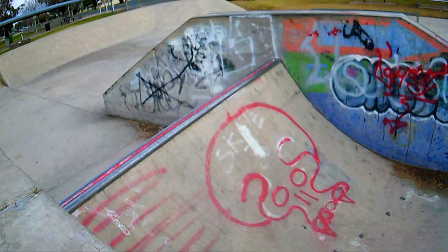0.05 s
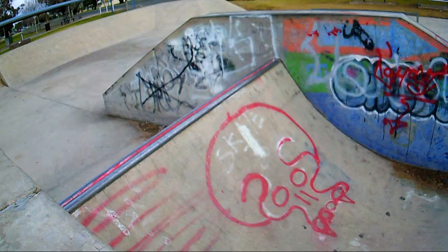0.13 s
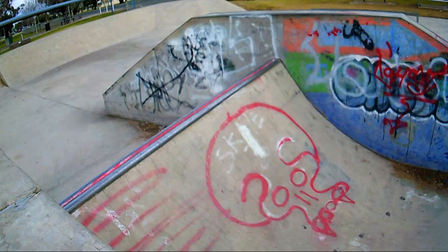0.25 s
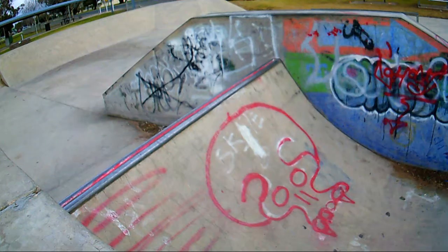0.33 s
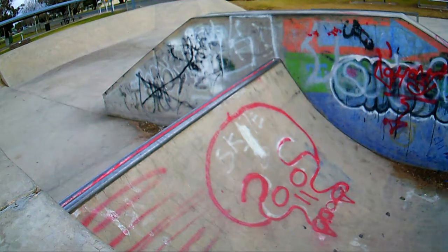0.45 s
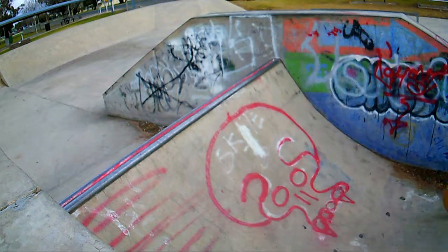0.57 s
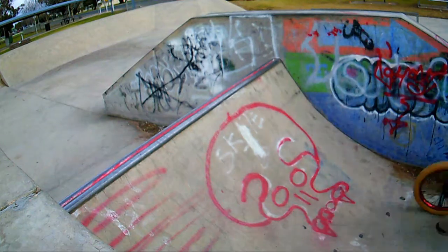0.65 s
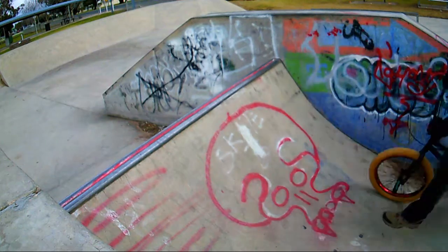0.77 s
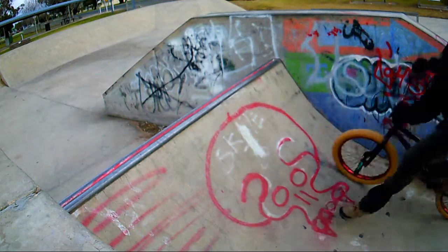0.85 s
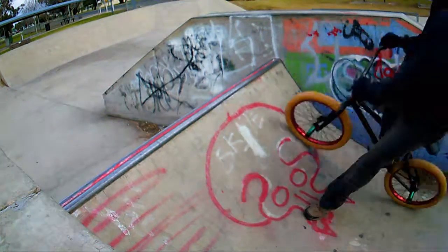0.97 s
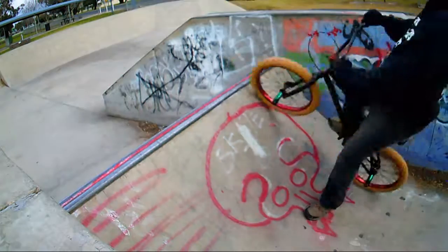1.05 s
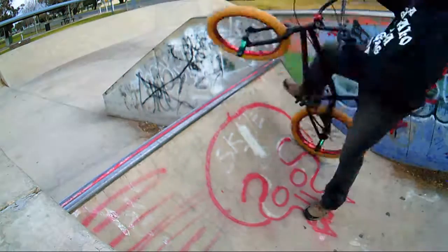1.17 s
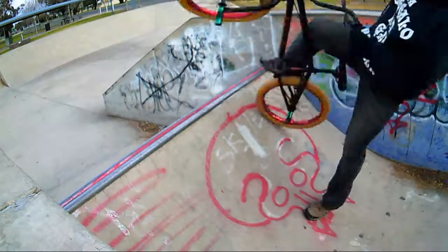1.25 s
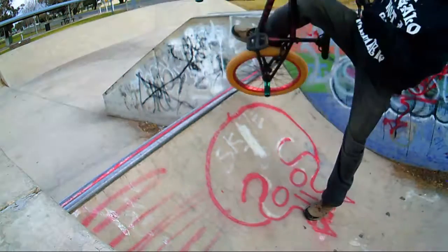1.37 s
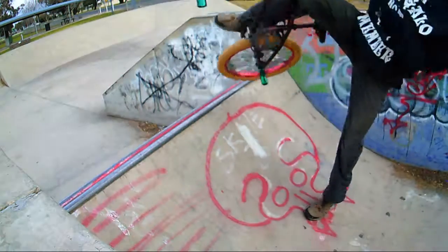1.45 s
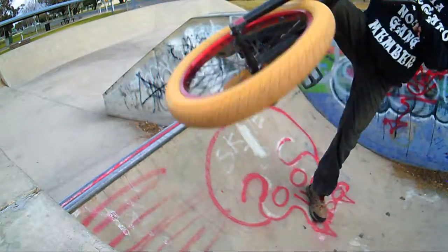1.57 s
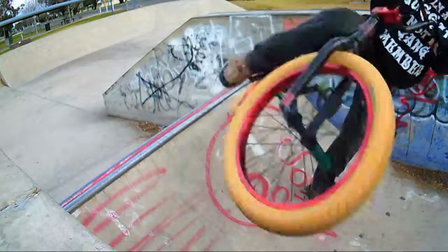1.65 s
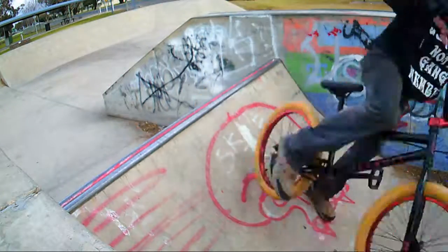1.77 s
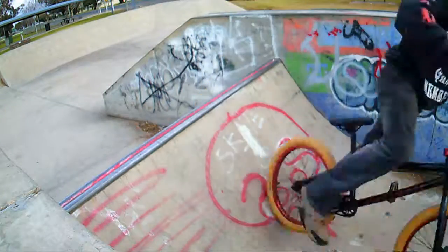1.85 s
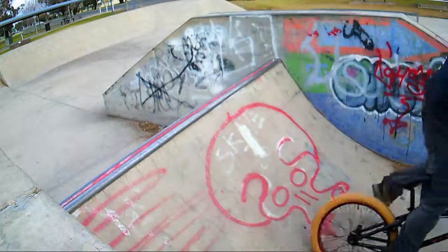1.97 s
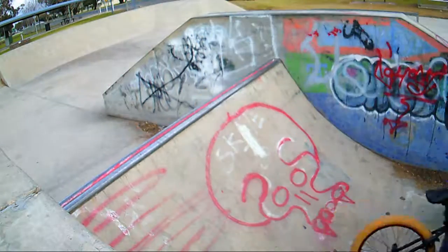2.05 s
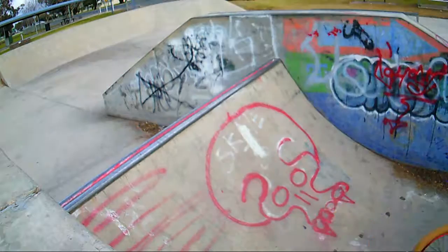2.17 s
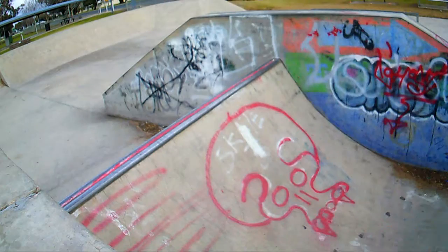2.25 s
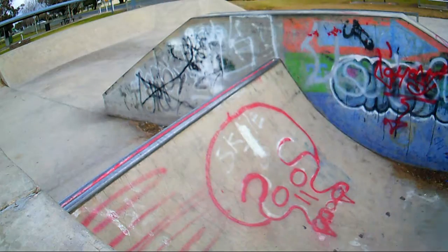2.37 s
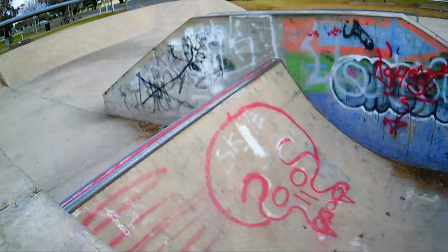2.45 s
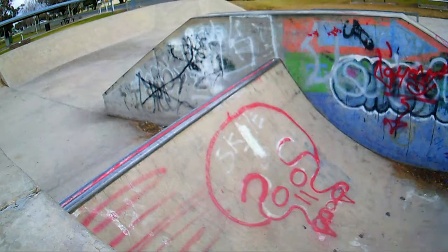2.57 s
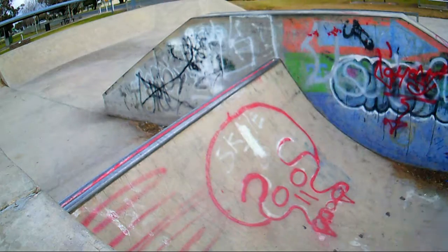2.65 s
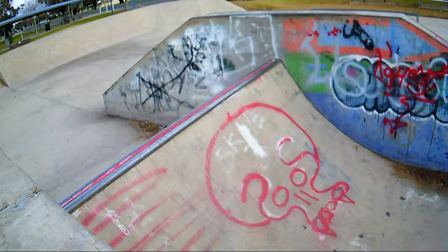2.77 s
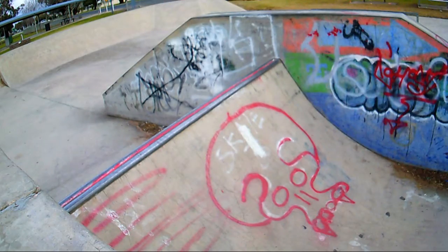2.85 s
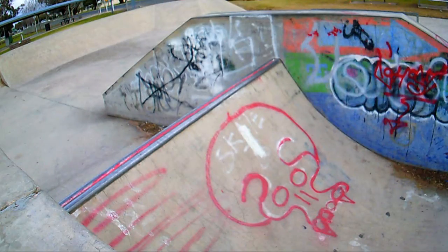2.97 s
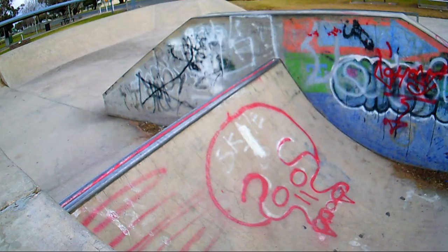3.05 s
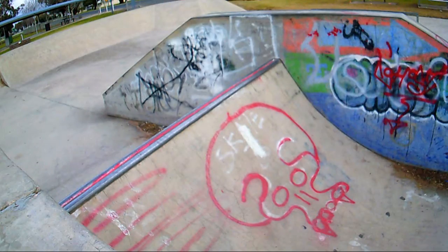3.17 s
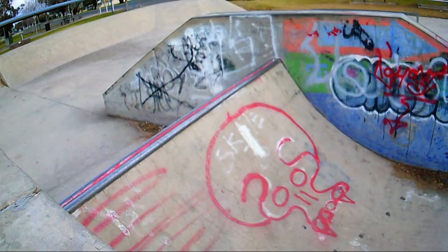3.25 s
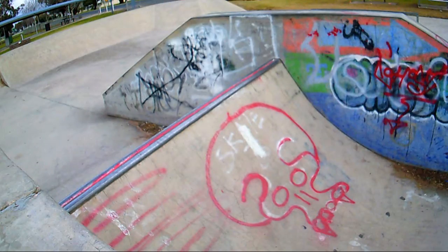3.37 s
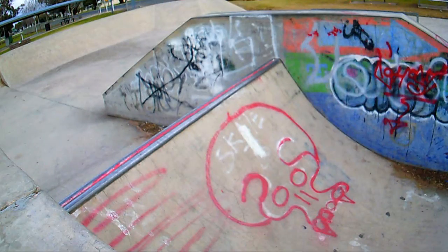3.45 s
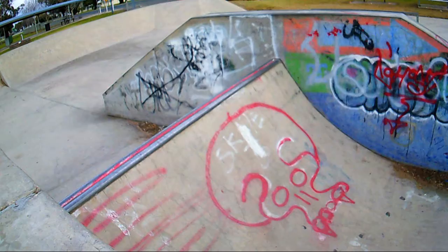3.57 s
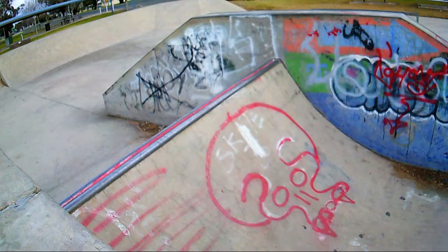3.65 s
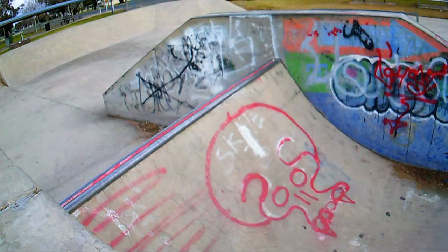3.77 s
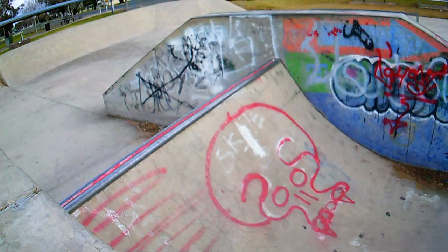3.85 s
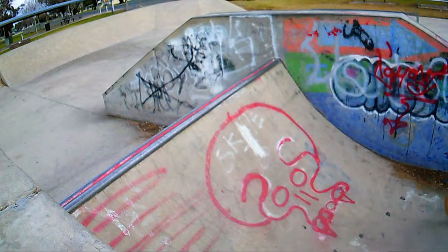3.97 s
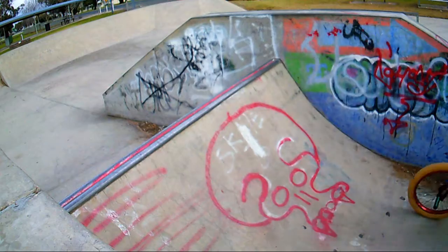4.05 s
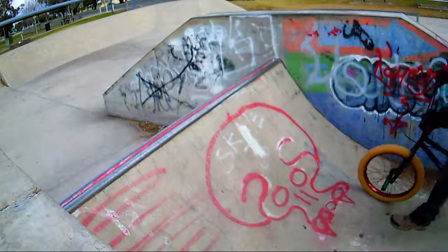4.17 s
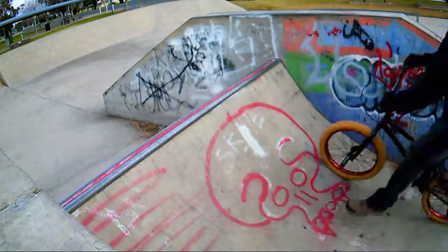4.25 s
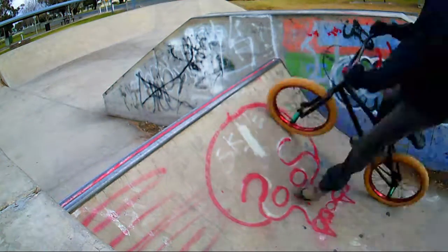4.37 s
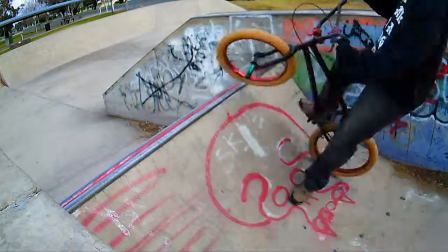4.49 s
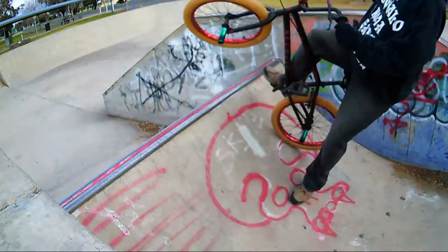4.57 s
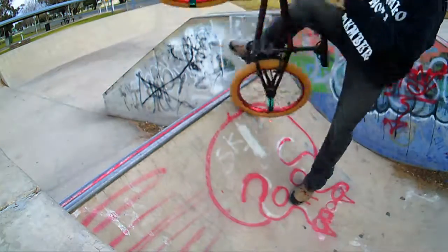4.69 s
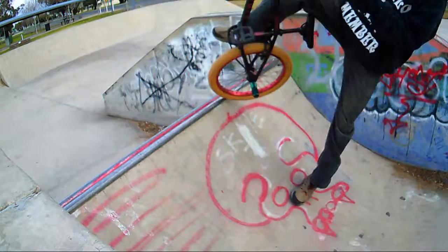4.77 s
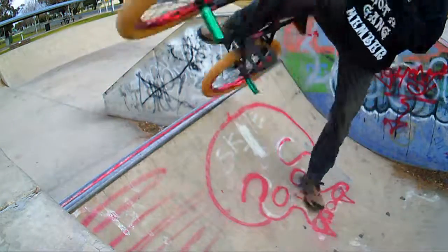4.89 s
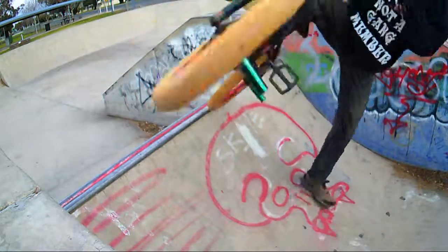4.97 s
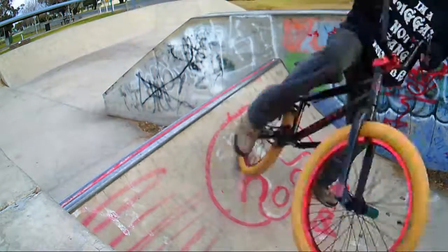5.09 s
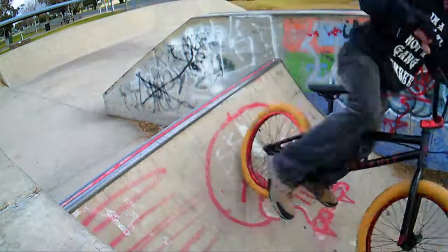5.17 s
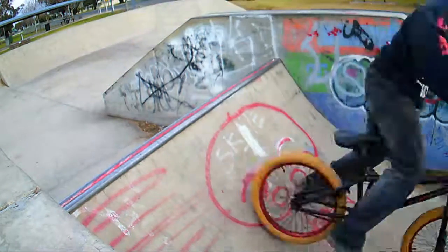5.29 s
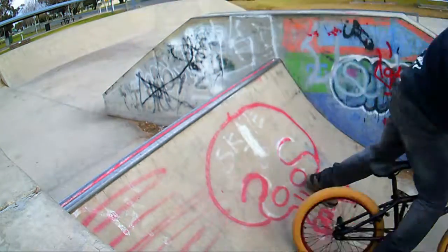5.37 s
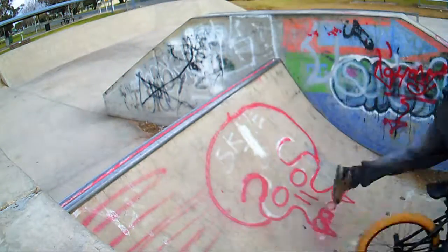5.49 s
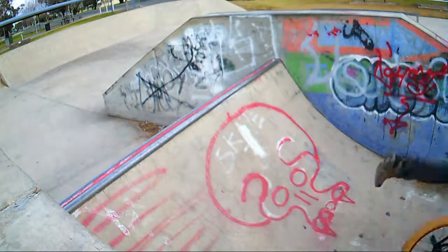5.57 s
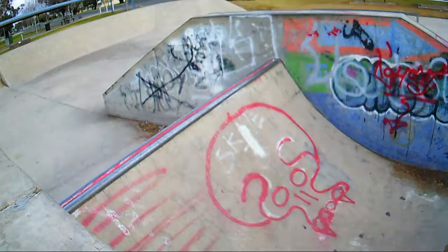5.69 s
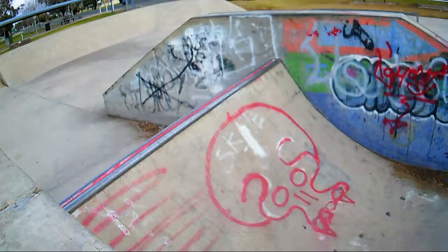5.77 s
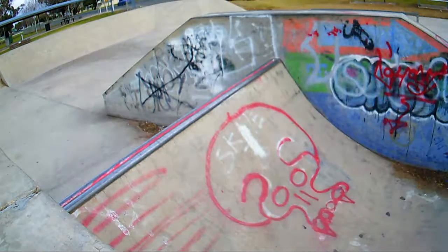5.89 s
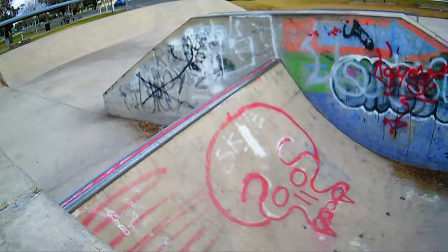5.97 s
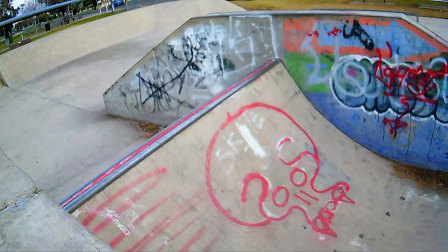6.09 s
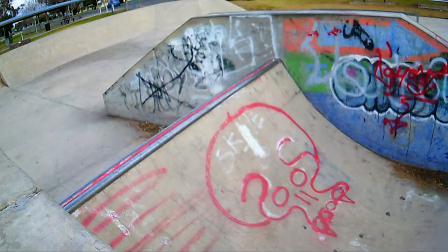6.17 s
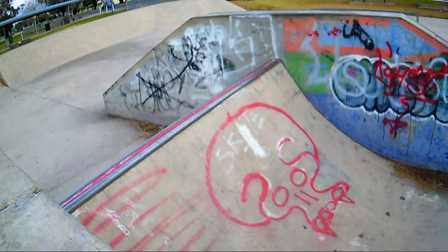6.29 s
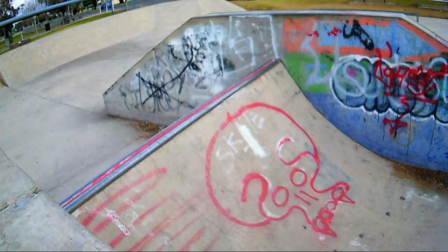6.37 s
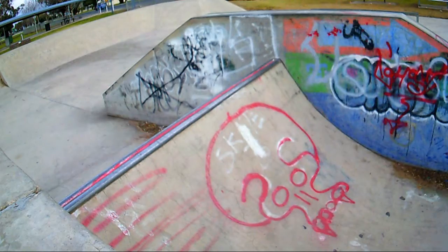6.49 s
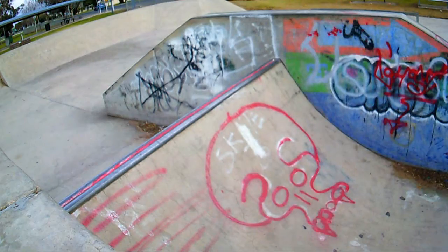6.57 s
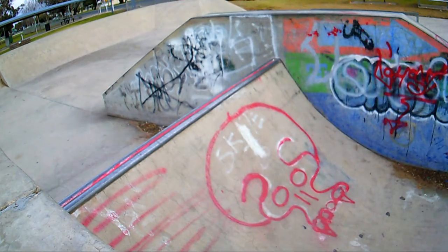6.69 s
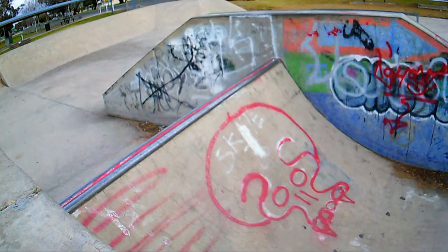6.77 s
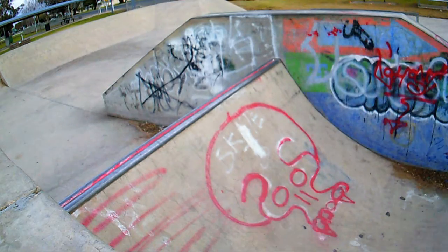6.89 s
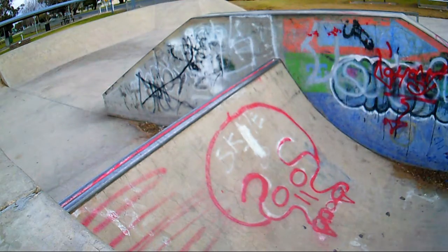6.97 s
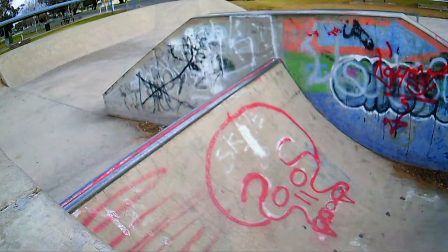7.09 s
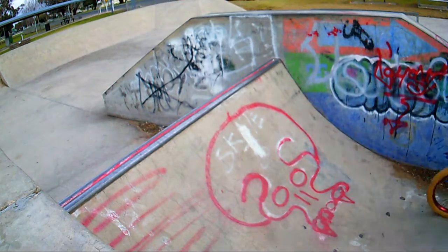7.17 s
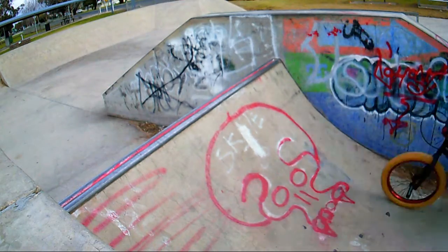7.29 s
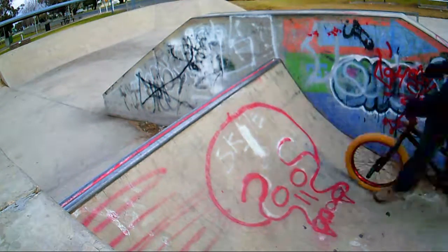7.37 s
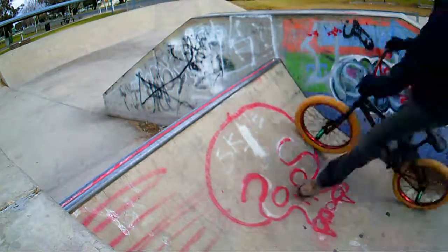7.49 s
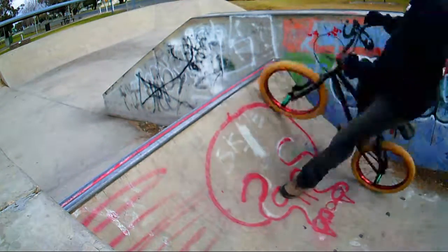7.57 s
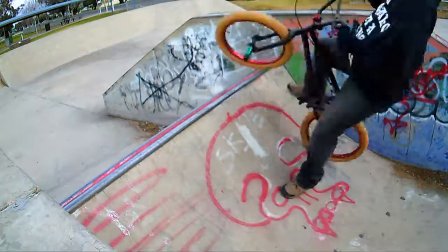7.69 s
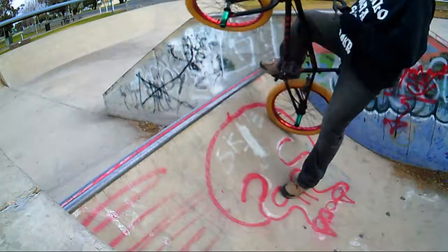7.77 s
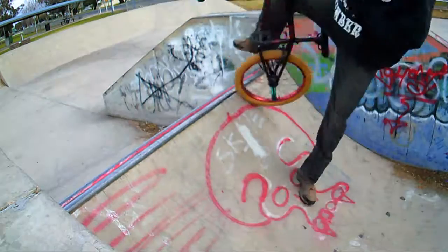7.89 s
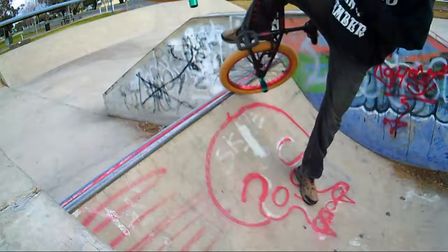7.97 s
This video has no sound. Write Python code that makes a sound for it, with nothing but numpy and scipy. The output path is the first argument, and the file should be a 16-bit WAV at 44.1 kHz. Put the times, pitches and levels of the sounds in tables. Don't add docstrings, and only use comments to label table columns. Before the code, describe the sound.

Outdoors on concrete, a small bicycle coasts in with a ticking freewheel, then lands in a loud cluster of dull knocks and rattles near two seconds. A second, quieter pass clatters past five seconds, and a third brings only light knocks. Traffic drones throughout, with engines pulling away after abrupt background changes. The close microphone sounds muffled, as if inside a case.

```python
import sys
import numpy as np
from scipy import signal
from scipy.fft import rfft, irfft, next_fast_len
from scipy.io import wavfile
from scipy.ndimage import uniform_filter1d, map_coordinates

SR = 44100
rng = np.random.default_rng(int(sys.argv[2]) if len(sys.argv) > 2 else 0)


def gain_from_db(level_db):
    decades = np.asarray(level_db, float) / 20
    return 10 ** decades


def to_wav(sig):
    pcm = np.clip(np.atleast_2d(sig), -1, 1) * 32767
    pcm = np.round(pcm).astype(np.int16)
    wavfile.write(sys.argv[1], SR, pcm.T)


N = 354563
T = np.arange(N) / SR


def unit(x):
    return x / np.sqrt(np.mean(x ** 2) + 1e-20)


def window(start, end):
    return np.clip(np.minimum(T - start, end - T) * 500 + .5, 0, 1)


def curves(rows):
    s, *columns = np.transpose(rows)
    return [np.interp(T, s, column) for column in columns] + [window(s[0] - .005, s[-1] + .005)]


def wobble(rate):
    return map_coordinates(rng.standard_normal(int(N * 80 / SR) + 9), [T * min(rate, 80)])


def filtered(x, response):
    m = next_fast_len(len(x) + 8192)
    return irfft(rfft(x, m) * response(np.fft.rfftfreq(m, 1 / SR)), m)[:len(x)]


def colour(points):
    f, v = np.transpose(points)
    return lambda hz: gain_from_db(np.interp(np.log(hz + 1), np.log(f + 1), v, left=-120, right=-120))


def modes(rows):
    def response(f):
        return sum((-1) ** k * gain_from_db(db) * 1j * f * width / (hz * hz - f * f + 1j * f * width)
                   for k, (hz, width, db) in enumerate(rows))
    return response


def rush(spectrum, patchy_db):
    z = signal.stft(rng.standard_normal(N + 512), nperseg=512)[2]
    field = uniform_filter1d(rng.standard_normal(z.shape), size=5, axis=0)
    field = uniform_filter1d(field, size=10, axis=1)
    patchy = signal.istft(z * gain_from_db(patchy_db * unit(field)), nperseg=512)[1][:N]
    return unit(filtered(patchy, colour(spectrum)))


CUTS = [-1, 3.1144, 6.6355, 9]


def per_take(values):
    return sum(v * window(CUTS[k], CUTS[k + 1]) for k, v in enumerate(values))


def contact(sharp, t60):
    t = np.arange(SR // 4) / SR
    fade = (gain_from_db(-60 * t / t60) + sharp * gain_from_db(-60 * t / 0.007)) * (1 - np.exp(-t / 0.0008))
    clumps = gain_from_db(5 * np.repeat(np.clip(rng.standard_normal(len(t) // 63), -2, 1.3), 63))
    blow = np.pad(rng.standard_normal(len(t)) * fade * clumps, (200, 0))
    blow[200:222] += 1.3 * sharp * np.hanning(22)
    return blow


# start_s, peak_db, body_db, hardness_db, t60_s
KNOCKS = [(1.855, -18.5, -2, -25, 0.048), (1.862, -23, -4, -14, 0.1), (1.894, -24.5, 1.5, -13, 0.091),
          (1.962, -18.5, -5, -19.5, 0.046), (1.982, -16.5, 0, -20.5, 0.08), (2.01, -27.5, 2, -25, 0.06),
          (4.446, -29, -2, -29, 0.061), (5.127, -23, 0, -17.5, 0.093), (5.149, -32, 3, -22.5, 0.1),
          (5.385, -17, -7, -13, 0.091), (5.409, -25, 0, -19.5, 0.26), (2.075, -32, 0, -25, 0.076)]
# start_s, peak_db, body_db, hardness_db, t60_s
CLACKS = [(1.002, -32.5, 3.5, -34, 0.11), (1.262, -38.5, -2.5, -26, 0.024), (1.57, -32, 2, -32.5, 0.056),
          (1.9493, -17, -6.5, -14, 0.15), (2.174, -19.5, -9.5, -58, 0.11), (2.189, -6, -21, -34, 0.035),
          (4.815, -25.5, -8.5, -34, 0.043), (5.013, -23.5, -4, -25, 0.034), (5.352, -13, -7, -25, 0.11),
          (6.393, -39.5, 9, -26, 0.048), (7.556, -25, -5, -27, 0.03), (7.566, -28, -2.5, -24, 0.021),
          (7.621, -35, 4, -28, 0.038), (7.932, -28, -10, -45, 0.11)]
# start_s, peak_db, metal_db
RATTLES = [(1.862, -45.5, -11.5), (1.905, -41.5, -18), (1.9383, -41.5, -21), (1.963, -42, -9),
           (1.983, -47, -13.5), (2.0172, -44.5, -9), (2.0537, -55.5, -23), (2.088, -53, -6.5),
           (2.113, -50, -12.5), (2.142, -52.5, -16), (2.256, -49.5, -32), (3.826, -55, -24),
           (4.4423, -49, -29.5), (5.1214, -50, -15.5), (5.174, -48, -13.5), (5.214, -50.5, -13),
           (5.288, -46, -12), (5.3094, -59.5, -14.5), (5.3374, -61, -26), (5.3453, -44.5, -13.5),
           (5.384, -46.5, -12.5), (5.409, -41, -31.5), (5.418, -40, -13.5), (5.445, -49.5, -15),
           (5.4934, -51, -7), (5.513, -56, -18.5), (6.3939, -56.5, -32.5), (7.929, -52, -35)]
# pitch_hz, width_hz, level_db
FRAME = [(224, 48, -5), (281.6, 41, -3.5), (376, 116, -2.5), (512, 82, -4), (780, 210, -6.5),
         (1000, 184, -3), (1314, 87, -3), (1633, 200, -5.5), (1820, 670, -16)]


def knocks():
    def muffled(rows, top_hz):
        return lambda hz: modes(rows)(hz) / (1 + 1j * hz / top_hz) ** 4

    def hits(rows, middle_db):
        return [(s, db, middle_db, body_db, hard_db, 1.09 * hard_db - 16.5, t60)
                for s, db, body_db, hard_db, t60 in rows]

    middle, body = muffled(FRAME[3:], top_hz=2860), muffled(FRAME[:3], top_hz=1160)
    edge = colour([(1500, -12.5), (2500, -4.5), (3800, -12.5), (4500, -31.5)])
    metal = colour([(4400, -15.5), (5800, -4.5), (6900, -10), (7900, 0.0), (9000, -12.5), (10200, -11.5),
                    (11200, -28.5), (11900, -28.5), (12400, 2.0), (12800, -8)])
    slaps = [(s, db, -60, -60, 0, metal_db, 0.058) for s, db, metal_db in RATTLES]
    out = np.zeros(N + SR)
    for rows, sharp in ((hits(KNOCKS, -3.5), .8), (hits(CLACKS, -9.5), 1.8), (slaps, .6)):
        for s, db, *parts_db, t60 in rows:
            blow = contact(sharp, t60)
            parts = [filtered(blow, response) for response in (middle, body, edge, metal)]
            mixed = sum(gain_from_db(db + gain) * part / np.abs(part).max() for gain, part in zip(parts_db, parts))
            out[round(s * SR) - 200:][:len(blow)] += mixed
    return out[:N]


# start_s, pitch_hz, level_db, t60_s
BOUNCES = [(1.006, 176, -31.5, 0.051), (1.6, 240, -42.5, 0.14), (1.955, 163, -19, 0.13),
           (1.9875, 93, -16.5, 0.43), (2.195, 94, -21.5, 0.082), (1.96, 360, -28, .15),
           (2.008, 385, -24.5, .1), (1.962, 790, -25.5, .1), (5.36, 1080, -25, .06),
           (5.371, 175, -20, 0.046), (5.13, 222, -30, .2), (2.174, 406, -20, 0.054),
           (7.558, 397, -28, 0.065), (1.861, 290, -23, 0.059), (5.129, 280, -26.5, 0.15),
           (5.39, 560, -24, 0.065), (2.19, 380, -14, 0.043), (2.1927, 1120, -12, 0.032),
           (4.4674, 338, -38.5, 0.23), (4.816, 236, -25.5, 0.072), (5.356, 260, -27.5, 0.22),
           (5.356, 320, -21, 0.14), (5.47, 285, -30.5, 0.14), (5.389, 88, -15.5, 0.55),
           (7.265, 230, -36.5, 0.12), (7.933, 204, -21.5, 0.056)]


def bounces():
    t = T[:SR]
    out = np.zeros(N + SR)
    for s, hz, db, t60 in BOUNCES:
        pitch = hz * (1 + 0.098 * (1 - np.exp(-t / 0.058)))
        fade = gain_from_db(db - 60 * (t / t60) ** 0.98) * (1 - np.exp(-t / 0.00056)) ** 2
        out[round(s * SR):][:SR] += fade * np.sin(2 * np.pi * np.cumsum(pitch) / SR)
    return out[:N]


# start_s, pitch_hz, peak_db
TAPS = [(1.8556, 991, -19), (1.8614, 1110.0, -23), (1.8646, 960.0, -20.5), (1.8688, 1130.0, -25),
        (1.8735, 980.0, -28), (1.8941, 960.0, -25.5), (1.9003, 810.0, -24), (1.908, 680.0, -22),
        (1.9495, 850.0, -13), (1.9562, 940.0, -16), (1.9605, 860.0, -17), (1.9635, 790.0, -22),
        (1.9759, 780.0, -23), (1.979, 1090.0, -24), (1.9839, 870.0, -18), (1.991, 850, -24),
        (2.006, 910.0, -24), (2.011, 910.0, -22), (2.1746, 750.0, -19.5), (2.1821, 690.0, -22),
        (2.1917, 1074, -9.5), (2.195, 1040, -19), (2.1989, 1120.0, -20.5), (2.2039, 1150.0, -22),
        (4.4423, 944, -25.5), (4.4472, 790.0, -26.5), (4.456, 970.0, -33), (4.4592, 950.0, -29),
        (4.8155, 1050, -26), (4.8335, 830.0, -32), (5.0134, 890, -24.5), (5.0193, 810.0, -28.5),
        (5.1278, 1101, -27), (5.1315, 1040.0, -27), (5.1388, 1100.0, -24), (5.1585, 900.0, -29),
        (5.1614, 1000, -28.5), (5.3526, 880, -13), (5.3582, 1050.0, -17), (5.363, 960.0, -22),
        (5.3856, 980.0, -20), (5.3888, 1050.0, -22), (5.3953, 866, -23.5), (5.3994, 800.0, -23.5),
        (5.404, 620.0, -24), (5.4264, 700.0, -21.5), (5.4452, 870.0, -24), (7.557, 820.0, -24.5),
        (7.5623, 780, -25.5), (7.5675, 980.0, -30), (7.9347, 876, -26.5),
        (1.0025, 700, -35),
    (1.2625, 900, -41),
    (1.571, 603, -30),
    (2.19, 638, -11),
    (4.8157, 1500, -31),
    (5.0135, 1880, -33),
    (5.129, 2100, -33),
    (6.3935, 700, -41),
    (7.6225, 798, -34.5),
]


def taps():
    ring_cycles, gain_db, top_hz = 9.9, 3, 2500
    out, t = np.zeros(N + SR), T[:SR // 20]
    for s, hz, db in TAPS:
        ring = sum(gain_from_db(level_db - 60 * t * hz / ring_cycles) * np.sin(2 * np.pi * ratio * hz * t)
                   for ratio, level_db in ((0.965, 0.5), (.55, -11.5), (1.483, -7.5)))
        out[round((s - .0003) * SR):][:len(t)] += gain_from_db(db + gain_db) * ring * (1 - np.exp(-t / 0.00036))
    low = signal.butter(6, top_hz / SR * 2, output="sos")
    return signal.sosfilt(low, out[:N])


# nearest_s, level_db, approach_s, leaving_s
PASSES = [
    (.97, -67, .16, 0.09),
    (1.92, -59, 0.04, 0.17),
    (2.24, -62.5, 0.044, 0.089),
    (4.298, -69.5, 0.14, 0.28),
    (4.86, -68.5, .05, 0.15),
    (5.2, -69.5, .03, 0.11),
    (5.45, -65.5, 0.046, 0.23),
    (7.52, -70, 0.2, 0.19),
]
FAR_DB = -77.5


def rolling_db():
    power = gain_from_db(2 * FAR_DB)
    for s, db, come, go in PASSES:
        distance = (T - s) / np.where(T < s, come, go)
        power = power + gain_from_db(2 * db) / (1 + distance ** 2) ** 2
    return 10 * np.log10(power)


def hiss_db():
    return FAR_DB - 15 + .9 * (rolling_db() - FAR_DB)


# start_s, tick_count,
# level_db
FREEWHEEL = [(.027, 6, -68), (.255, 1, -63), (.281, 6, -72), (.51, 1, -70), (.6205, 2, -61),
             (.6715, 1, -62), (.686, 4, -60), (.768, 1, -58), (.78, 3, -61), (.832, 8, -59), (.981, 1, -60),
             (.998, 6, -60), (1.072, 2, -62), (1.108, 3, -63), (1.17, 1, -68), (1.211, 3, -67),
             (1.316, 2, -66), (1.357, 1, -64), (1.42, 2, -65), (1.45, 1, -66), (1.715, 1, -62),
             (1.74, 4, -61), (1.831, 1, -60), (2.363, 2, -62), (2.403, 2, -63), (2.435, 2, -64),
             (2.481, 2, -62), (2.54, 2, -64), (2.62, 3, -68), (2.726, 3, -67), (2.847, 1, -63),
             (2.902, 1, -66), (2.955, 3, -67), (3.082, 1, -66),
             (3.296, 2, -67), (3.337, 7, -66), (3.561, 1, -67), (4.077, 2, -64), (4.112, 1, -62),
                   (4.136, 5, -61), (4.233, 5, -59), (4.309, 2, -61), (4.35, 5, -60), (4.42, 3, -61),
                   (4.484, 5, -63), (4.566, 1, -62), (4.592, 1, -62), (4.641, 1, -66), (5.045, 1, -63),
                   (5.068, 1, -62), (5.111, 1, -62), (5.16, 1, -58), (5.196, 1, -60), (5.238, 2, -61),
                   (5.275, 1, -59), (5.537, 1, -59), (5.57, 2, -62), (5.612, 3, -59), (5.659, 1, -59),
                   (5.681, 1, -63), (5.715, 1, -63), (5.743, 1, -63), (5.786, 2, -62), (5.855, 4, -62),
                   (5.973, 2, -63), (6.045, 1, -64), (6.069, 2, -64), (6.108, 1, -63), (6.134, 2, -64),
                   (6.207, 1, -66), (6.249, 1, -64), (6.672, 3, -68), (6.75, 7, -67), (6.909, 2, -65),
                   (6.96, 2, -64), (7.025, 1, -66), (7.065, 1, -65), (7.118, 1, -64), (7.338, 3, -62),
                   (7.38, 2, -59), (7.414, 4, -64), (7.493, 4, -61), (7.555, 2, -61), (7.589, 2, -63),
                   (7.621, 3, -62), (7.665, 1, -66), (7.688, 1, -63), (7.704, 1, -66), (7.731, 1, -62),
                   (7.752, 1, -67)]
# pitch_hz, width_hz, level_db
PAWL = [(3060, 320, -2), (3710, 150, -0.5), (4370, 290, -7)]
# pitch_hz, width_hz, level_db
SPOKES = [(4470, 500, -5), (5770, 1200, -6), (7900, 980, -3.1), (8670, 600, -7.5)]


def freewheel():
    rows = FREEWHEEL
    following = rows[1:] + rows[-1:]
    ticks = np.concatenate([np.linspace(s, later[0], count, endpoint=False)
                            for (s, count, db), later in zip(rows, following)])
    scatter = rng.standard_normal((len(ticks), 2))
    beats = np.zeros(N)
    beats[((ticks + .0007 * scatter[:, 0]) * SR).astype(int)] = gain_from_db(1.3 * scatter[:, 1])
    drops = gain_from_db(np.interp(T, [row[0] for row in rows], [row[2] for row in rows]))

    def fading_noise(t60):
        return signal.lfilter([1], [1, -gain_from_db(-60 / (t60 * SR))], beats) * rng.standard_normal(N)

    def hub_response(hz):
        return modes(PAWL)(hz) / (1 + (hz / 5100) ** 12)

    def spoke_response(hz):
        ring = modes(SPOKES)(hz)
        return ring * np.abs(ring) * gain_from_db(1.9 * np.sin(hz / 150))

    rattle = 4.5 * beats + .6 * fading_noise(0.02) + 0.07 * fading_noise(0.11)
    hub = filtered(drops * rattle, hub_response)
    spokes = filtered(fading_noise(.028), spoke_response)
    return gain_from_db(11.5) * hub + gain_from_db(hiss_db() + 31) * spokes


def rubber_clumps():
    return gain_from_db(1.0 * wobble(60) + 0.48 * wobble(18))


# pitch_hz, level_db_per_hz
GRIT = [(500, 14), (1100, 24), (1800, 8), (2450, 0.5), (3200, -6.5), (3900, -14.5), (4500, -30)]
# pitch_hz, level_db_per_hz
HISS = [(4300, -13.5), (4800, -8), (5800, -4.5), (6600, -6), (7900, -1), (8900, -7), (10000, -12.5),
        (11200, -27)]


def bright_grit():
    return [(hz, db) for hz, db in GRIT if hz > 1500]


def tyres(clumps):
    grit_db = rolling_db()
    out = gain_from_db(grit_db + 3.5) * unit(clumps * rush([(1300, -10.5)] + bright_grit(), patchy_db=3.5))
    out += gain_from_db(hiss_db() - 5) * unit(clumps * rush(HISS, patchy_db=1))
    tread = rush(ROAR, patchy_db=0.0) + gain_from_db(-4.0) * rush(DRONE, patchy_db=3.0)
    return out + gain_from_db(-66.5 + 16 + 1.07 * (grit_db + 68)) * tread


# middle_s, half_length_s, level_db, brightness_db
SCUFFS = [(0.967, 0.01, -46, -2), (1.266, 0.006, -48.5, -3), (1.52, 0.033, -48.5, 3.5),
          (1.556, 0.011, -53, 8), (1.679, 0.021, -47.5, 4), (1.901, 0.012, -44, 7), (2.084, 0.013, -49, -2),
          (2.301, 0.075, -51, -5), (2.356, 0.016, -48, -2), (2.494, 0.071, -55.5, -6),
          (4.811, 0.013, -56.5, 15.5), (5.194, 0.057, -48, 2), (5.466, 0.039, -52, 5),
          (7.266, 0.012, -50, 4), (7.855, 0.012, -48, 14.5)]


def scuffs(clumps):
    full, thin, air = rush(GRIT, patchy_db=2), rush(bright_grit(), patchy_db=2), rush(HISS, patchy_db=2)
    out = np.zeros(N)
    for s, half, db, bright_db in SCUFFS:
        stroke = gain_from_db(db) * np.exp(-.5 * ((T - s) / half) ** 2) * clumps
        scrape = gain_from_db(-bright_db) * full + gain_from_db(bright_db - 16.5) * thin + gain_from_db(.5 * bright_db - 38.0) * air
        out += stroke * scrape
    return out


def bowl(x):
    t = T[:SR // 2]
    dull = filtered(rng.standard_normal(len(t)), lambda hz: 1 / (1 + (hz / 2500) ** 2))
    tail = dull * gain_from_db(-60 * t / 0.31) * (t > .012)
    return signal.fftconvolve(x, tail / np.linalg.norm(tail))[:N]


# start_s, level_db
SPLICES = [
    (3.1155, -43.5),
    (6.6354, -49.5),
]


def splices():
    return sum(gain_from_db(db - 60 * np.clip(T - s, 0, None) / .02) * (T >= s) for s, db in SPLICES)


def engine(hz, orders, unsteady, flutter_db):
    turn = 2 * np.pi * np.cumsum(hz) / SR
    out = np.zeros(N)
    for k, db in orders:
        level = np.sqrt(2) * gain_from_db(db + flutter_db * wobble(13))
        out += level * np.sin(k * turn + unsteady * wobble(9.8) + 6 * rng.random())
    return out


# start_s, level_db
CAR = [
    (3.12, -37.5),
    (3.2, -30),
    (3.5, -42),
    (3.66, -34),
    (3.88, -27.5),
    (3.97, -46),
    (4.15, -38),
    (4.4, -33),
    (4.6, -48),
]


def car():
    db, on = curves(CAR)
    since = T - CAR[0][0]
    hz = 58.04 + 10.1 * since - 2.4 * since ** 2
    return on * engine(hz, [(1, db), (2, -49.5), (3, -50)], unsteady=0.095, flutter_db=0.1)


# start_s, level_db
VAN = [
    (5.5, -51.5),
    (5.72, -56.5),
    (5.85, -50),
    (6.1, -47.5),
    (6.5, -47),
    (6.63, -45.5),
]


def van():
    db, on = curves(VAN)
    since = np.clip(T - VAN[0][0], 0, 2)
    hz = 27.03 + 4.1 * since - 1.151 * since ** 2
    boom_db, whine_db = db - 3 + 5 * since, -53 - 9.5 * since
    orders = [(3, db + 4.5), (6, boom_db), (7, db - 8.5), (8, db + 0.5), (9, db - 10), (12, db - 17),
              (13, whine_db), (14, db - 14.0)]
    return on * engine(hz, orders, unsteady=.1, flutter_db=1.4)


# start_s, level_db
BUS = [
    (6.64, -35.5),
    (6.87, -35),
    (7.08, -42),
    (7.2, -34.5),
    (7.5, -36.5),
    (7.89, -41),
    (8.04, -41),
]


def bus():
    second, on = curves(BUS)
    since = T - BUS[0][0]
    first = second - 4 + 9.5 * since
    orders = [(1, first), (2, second), (3, second - 16), (6.5, second - 24), (10, second - 24)]
    return on * engine(30.4 + 4.4 * since, orders, unsteady=0.4, flutter_db=1.85)


# start_s, pitch_hz, level_db
IDLE = [(0, 79.7, -43), (.6, 82.4, -41), (1.6, 81.37, -41), (2.4, 77.8, -45.5), (3.1, 76.86, -44.5),
        (3.25, 78, -41), (4.4, 81.53, -38), (4.8, 79.9, -39.5), (4.9, 82, -36.5), (5.1, 78.7, -36),
        (5.3, 78.96, -42.5), (5.9, 79.9, -39), (6.63, 81, -41.5)]


def standing_engines():
    hz, db, on = curves(IDLE)
    out = on * engine(hz, [(0.97, db)], unsteady=.7, flutter_db=0.5)
    lorry_db = per_take([-42.5, -48, -68.5])
    return out + engine(33.2 + 0 * T, [(0.99, lorry_db)], unsteady=0.72, flutter_db=2.5)


# pitch_hz, level_db_per_hz
ROAR = [(180, -38.5), (300, -5), (376, -13.5), (487, -5.5), (543, -4.5), (611, -2), (1130, 0.5),
        (1780, -14), (2590, -33), (3950, -48), (5140, -82), (8690, -120)]
# pitch_hz, level_db_per_hz
DRONE = [(100, -15), (140, 3.5), (230, -3.5), (350, -12), (550, -12.5)]
# pitch_hz, level_db_per_hz
RUMBLE = [(15, -16), (30, 2.5), (60, 1.5), (100, -5.5), (130, -13)]
# roar_db, drone_db, rumble_db
TAKES = [
    (-56.5, -50, -38.5),
    (-44.5, -45, -37.5),
    (-51, -47, -36),
]
# start_s, swell_db
TRAFFIC = [(0, 0.5), (1.5, 2), (2.6, 1.5), (3.11, 1), (3.2, 0.5), (3.9, 3), (4.4, 1.5), (4.8, -1),
           (5.3, 0.5), (6.63, -.5), (6.7, 0.5), (7.4, 2), (8.04, 0.6)]


def road():
    swell_db = curves(TRAFFIC)[0]
    roar_db, drone_db, rumble_db = (per_take(column) for column in np.transpose(TAKES))
    drone_db = drone_db + 0.25 * swell_db - 0.5 * wobble(2.1)
    rumble_db = rumble_db + 0.23 * swell_db - 2.5 * wobble(3.916)
    out = gain_from_db(roar_db + swell_db) * rush(ROAR, patchy_db=1.0)
    out += gain_from_db(drone_db) * rush(DRONE, patchy_db=2.5)
    return out + gain_from_db(rumble_db) * rush(RUMBLE, patchy_db=1.2)


# pitch_hz, level_db_per_hz
FLOOR = [(3500, 1.5), (4600, 1), (5500, -12), (6500, 2), (8000, -2.5), (9500, -5.5), (11000, -20.5),
         (12700, -24.5)]


def preamp_hiss():
    return gain_from_db(-90) * rush(FLOOR, patchy_db=.6)


def scene():
    near = knocks() + bounces() + freewheel() + taps()
    clumps = rubber_clumps()
    bicycle = near + gain_from_db(-22.5) * bowl(near) + tyres(clumps) + scuffs(clumps)
    engines = standing_engines() + car() + van() + bus()
    return (bicycle + road() + engines + splices())[None]


def band_limit(x):
    return signal.sosfilt(signal.butter(12, 12800, fs=SR, output="sos"), x)


def record(dry):
    mix = dry * window(.002, 9) + preamp_hiss()
    return band_limit(mix)


dry = scene()
out = record(dry)
to_wav(out)
```